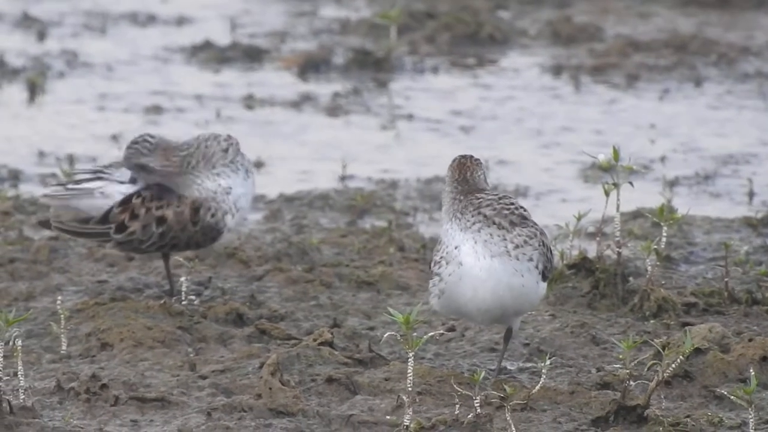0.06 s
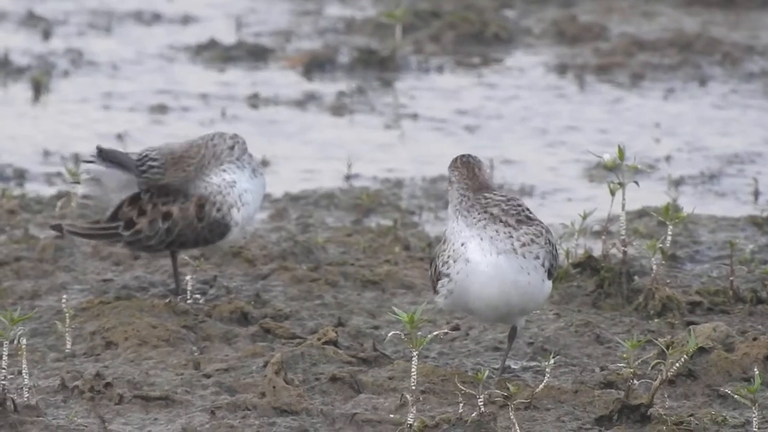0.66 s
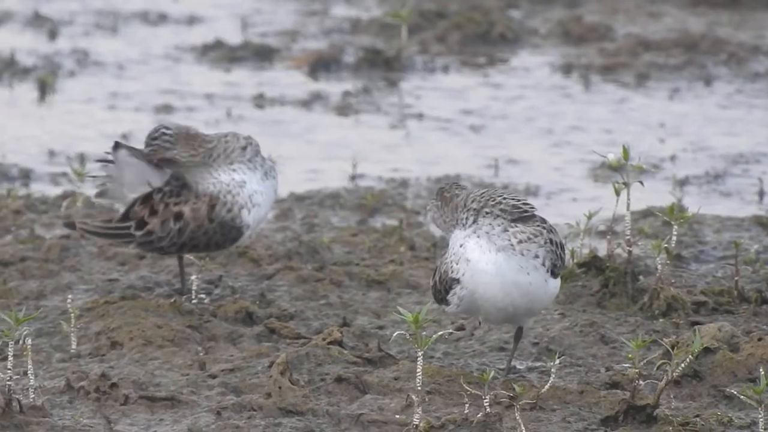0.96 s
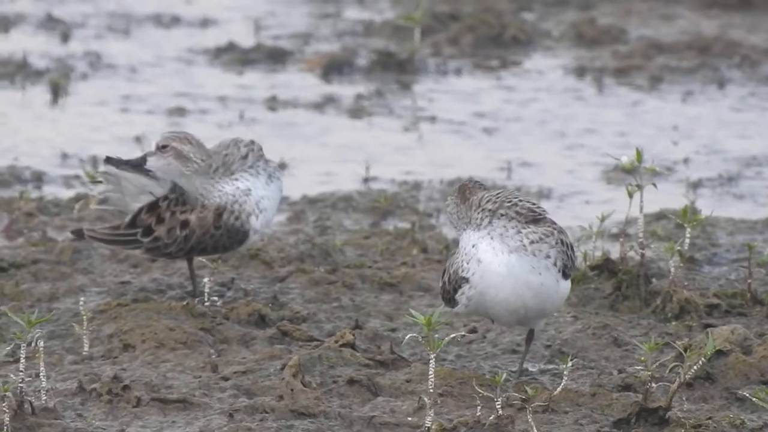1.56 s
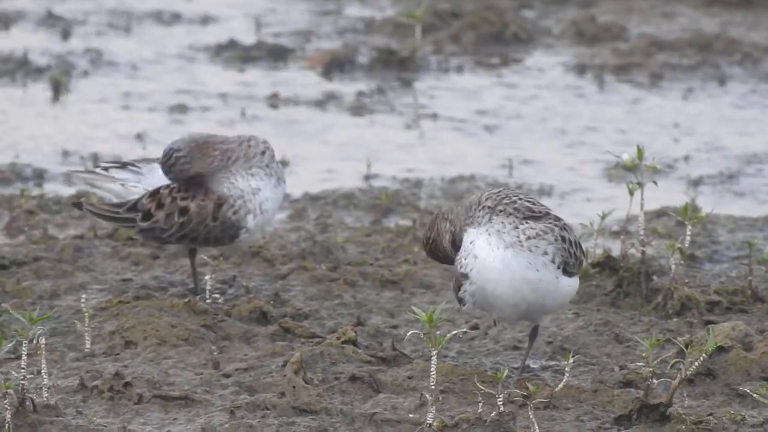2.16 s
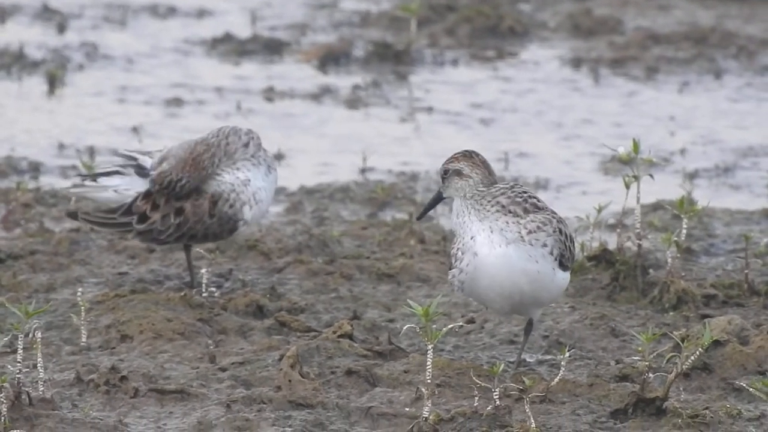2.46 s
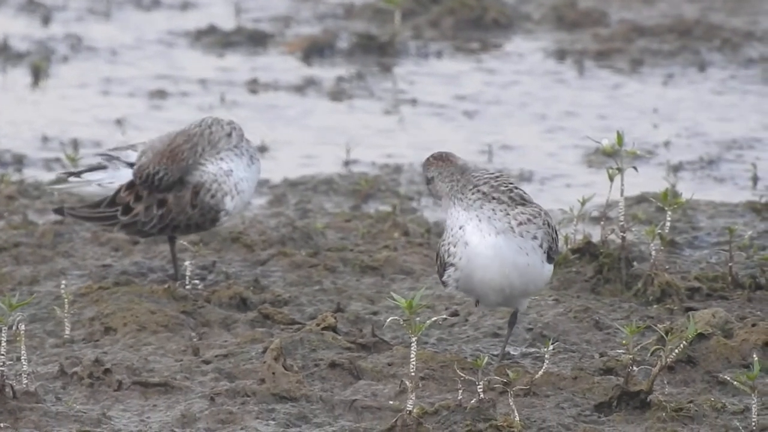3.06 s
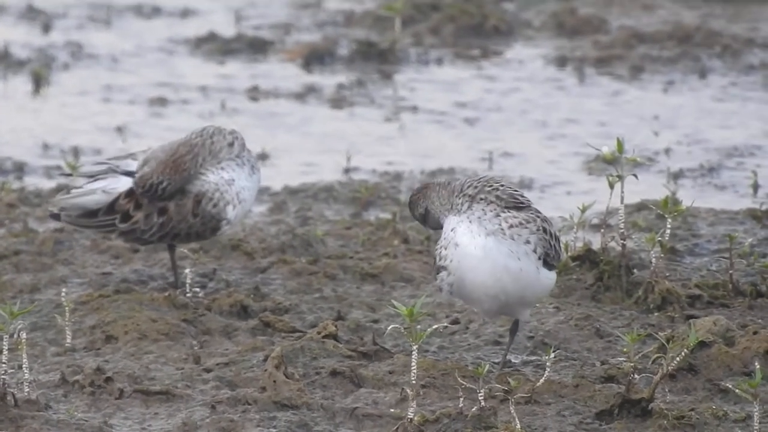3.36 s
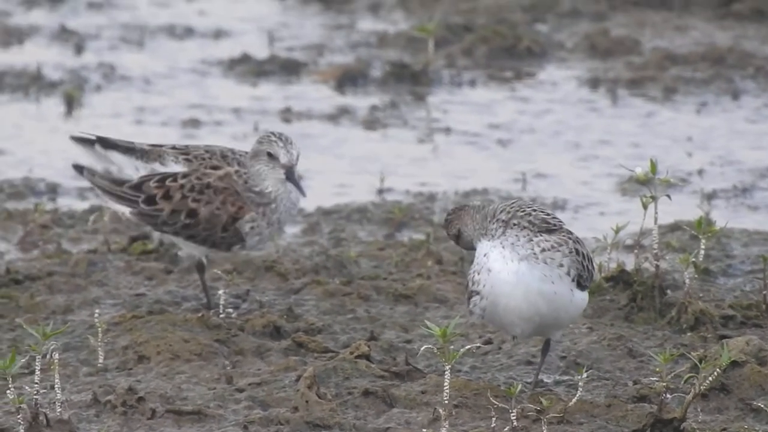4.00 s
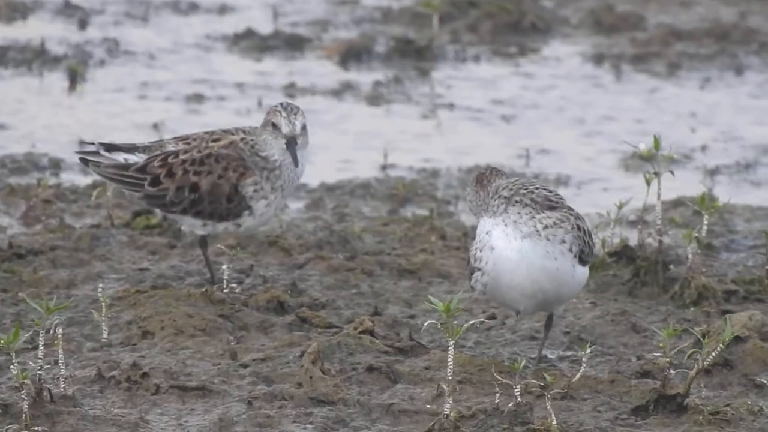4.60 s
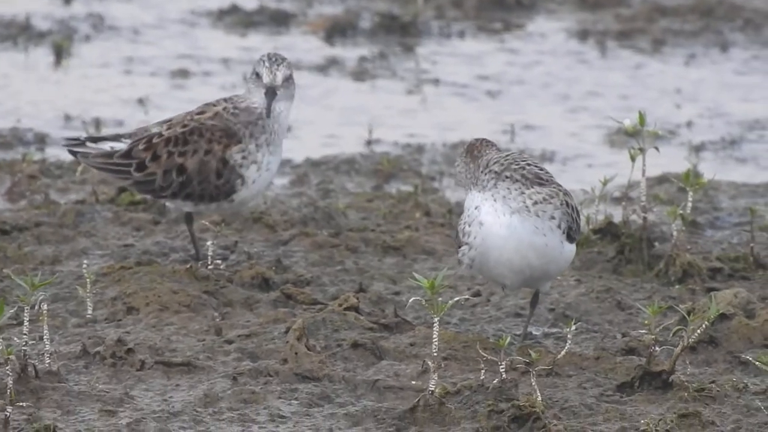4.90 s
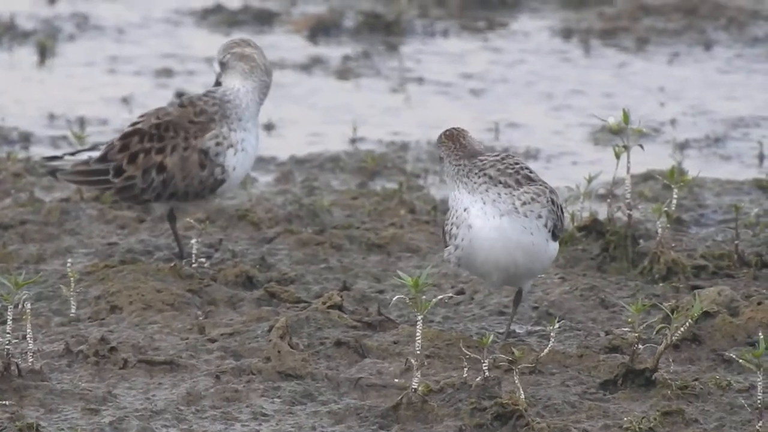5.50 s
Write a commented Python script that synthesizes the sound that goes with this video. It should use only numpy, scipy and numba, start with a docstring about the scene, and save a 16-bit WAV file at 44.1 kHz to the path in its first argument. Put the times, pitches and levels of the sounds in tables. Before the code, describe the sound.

Low wind rumble thumps on the microphone from the first instant, outdoors on an open mudflat, and returns in uneven puffs through the first second and a half. Far behind it, birds give faint hoarse peeps and tiny high chips over a soft hush of land and water. From about 1.3 seconds one bird faintly repeats a falling note, and a thin whistle stands out in a lull near 1.7 seconds. The wind builds again at 2.1 seconds and is loudest from 2.4 to 2.8, with hard thumps, ticks and crackles. Two low, gull-like mews follow around 2.8 and 3.2 seconds, with a dry, high trill from 2.9 to 3.5. Another mew comes near 4.2 seconds and a falling whistle at 5. Lighter gusts, mostly on the right, continue until the end at about 5.6 seconds. The birds always stay much quieter than the wind.

```python
"""Wind thumps on the microphone, out on an open mudflat. Far across the flat birds call: whistles,
low mews, arched peeps, short chips and one dry trill, over a faint hush of land and water.
The calls are gliding tones and resonant noise, hoarse where pitch and strength waver fast.
Gusts buffet the microphone's two ports separately; the hardest eddies hit the camera's limiter,
which reacts a moment late and so ticks and crackles."""
import sys
import numpy as np
from scipy import signal
from scipy.fft import rfft, irfft
from scipy.io import wavfile
from scipy.ndimage import uniform_filter1d
from numba import njit

SR = 44100
rng = np.random.default_rng(int(sys.argv[2]) if len(sys.argv) > 2 else 0)


def store_wav(level_fs):
    """Save 16-bit WAV to argv[1]."""
    pcm = np.round(np.clip(np.atleast_2d(level_fs), -1, 1) * 32767)
    wavfile.write(sys.argv[1], SR, pcm.T.astype(np.int16))


N = 249165
TIME = np.arange(N) / SR


def undb(db):
    """Decibels to gain."""
    return 10 ** (np.asarray(db) / 20)


def unit(x):
    """Scale to rms 1."""
    return x / np.sqrt(np.mean(x ** 2) + 1e-18)


def over_time(points):
    """Points joined by straight lines in time, for every sample."""
    return np.interp(TIME, *np.transpose(points))


def over_bins(points):
    """Points joined on a log-frequency axis, for every spectral bin."""
    hz, value = np.transpose(points)
    return np.interp(np.log(np.fft.rfftfreq(N, 1 / SR) + 1), np.log(hz), value)


def smooth(x, first, second):
    """Two moving averages in a row, their lengths in samples."""
    return uniform_filter1d(uniform_filter1d(x, first), second)


def noise(gain):
    """Noise with the given gain per bin."""
    return irfft(rfft(rng.standard_normal(N)) * gain, N)


def band_noise(hz, width_hz, shape=N):
    """Noise passed twice through one resonance."""
    b, a = signal.iirpeak(hz, hz / width_hz, fs=SR)
    return signal.lfilter(b, a, signal.lfilter(b, a, rng.standard_normal(shape)))


def walk(rate):
    """Smooth wandering through `rate` random values a second; rms 1."""
    step = max(int(SR / rate), 2)
    held = np.repeat(rng.standard_normal(N // step + 1), step)
    return unit(smooth(held, step, step)[:N])


def ports(pan_db):
    """Left and right gains of mean power 1; a positive pan is to the left."""
    pair = undb([[pan_db / 2], [-pan_db / 2]])
    return unit(pair)


def add(out, start, sound):
    """Mix a sound in at a time in seconds."""
    i = max(int(start * SR), 0)
    out[..., i:i + sound.shape[-1]] += sound[..., :N - i]


def hush(level_db=-58.5, flicker_db=1.5, bass_db=-5.5):
    """Faraway land and water: the middle register wavers, the hiss above it stays smooth."""
    # colour of the open air: (frequency [Hz], relative density [dB])
    spectrum = [(15, -48), (25, -6), (55, 8.5), (103, 4.5), (250, -11), (450, -25), (700, -31.5),
                (1000, -28.5), (1400, -34.5), (1900, -33.5), (3300, -35.5), (4400, -32), (6400, -33),
                (8500, -38), (15000, -47.5)]
    # likeness of left and right: (frequency [Hz], correlation [0..1])
    likeness = [(60, 0.9), (300, 0.6), (1400, 0.57), (3100, 0.37), (7000, 0.054), (15000, .1)]
    # slow swell of the middle register: (time [s], gain [dB])
    swell = [(0, 1.5), (.8, -2), (1.55, 0.5), (1.85, 3.5), (3.2, 0), (3.7, 3), (4.3, 3.5), (5.1, -4.5),
             (5.65, 4)]
    gain, alike = undb(over_bins(spectrum)), over_bins(likeness)
    mid, side = noise(gain * np.sqrt(1 + alike)), noise(gain * np.sqrt(1 - alike))
    pair = np.array([mid + side, mid - side])
    bass = signal.sosfiltfilt(signal.butter(4, 380, fs=SR, output="sos"), pair)
    upper = pair - bass
    middle = signal.sosfiltfilt(signal.butter(2, 3000, fs=SR, output="sos"), upper)
    hiss = upper - middle
    air = undb(bass_db) * bass + middle * undb(over_time(swell) + flicker_db * walk(12)) + hiss
    return air / np.std(upper.mean(axis=0)) * undb(level_db)


def hums(waver_db=1.5):
    """Narrow bands of far-off hum that waver in level, alike at both ports."""
    # distant hums: (centre [Hz], resonance width [Hz], level [dB])
    bands = [(329, 66, -65.5), (466.3, 56, -67), (646, 82, -71.5), (760, 13.7, -69.5), (1136, 69, -83),
             (1388, 62, -71)]
    return sum(undb(db + waver_db * walk(21.95)) * unit(band_noise(hz, width_hz))
               for hz, width_hz, db in bands)


def shore(x, wet_db, t60_s=0.13):
    """Banks and plants scatter a thin, short tail that arrives 6 ms behind the direct sound."""
    t = np.arange(SR // 2) / SR
    tail = rng.standard_normal((2, len(t))) * undb(-60 * t / t60_s) * (t > .006)
    tail /= np.sqrt(np.sum(tail ** 2, axis=1, keepdims=True))
    return x + undb(wet_db) * signal.fftconvolve(x, tail, axes=1)[:, :N]


def note(length, pitches, partials_db, waver, edge):
    """A bird note gliding through its pitches; fast wavering of pitch and strength makes it hoarse."""
    n = max(int(length * SR), 64)
    progress = np.linspace(0, 1, n)
    contour = np.polyfit(np.linspace(0, 1, len(pitches)), pitches, len(pitches) - 1)
    hz = np.polyval(contour, progress)
    knots_s = np.arange(160) * .0015
    jitter = rng.standard_normal((2, len(knots_s)))
    wobble, shimmer = (np.interp(progress * length, knots_s, row) for row in jitter)
    phase = 2 * np.pi * np.cumsum(hz * (1 + waver * wobble)) / SR
    tone = sum(undb(db) * np.sin(k * phase) for k, db in enumerate(partials_db, 1))
    return np.sqrt(2) * tone * undb(2 * shimmer) * signal.windows.tukey(n, edge)


def rasp(length, hz, width_hz, spread=0.21):
    """A hoarse patch of noise in one resonance, mostly alike left and right."""
    n = int(length * SR)
    mid, side = band_noise(hz, 0.86 * width_hz, (2, n))
    pair = np.array([mid + spread * side, mid - spread * side])
    return unit(pair) * signal.windows.tukey(n, .6)


def flock(faintest_db=-68.5, range_db=4.0, low_hz=1500, high_hz=4400, arch=.14, count=70):
    """The farthest birds chatter at random across the flat, barely above the hush."""
    out = np.zeros((2, N))
    for when, size, pitch, glide, loud, side in rng.random((count, 6)):
        hz = low_hz * (high_hz / low_hz) ** pitch
        pitches = [hz * (1 - arch * glide), hz, hz * (1 - arch * (1 - glide))]
        peep = note(.025 + .05 * size, pitches, partials_db=[0, -12], waver=.03, edge=.7)
        add(out, when * N / SR, ports(8 * (side - .5)) * undb(faintest_db + range_db * loud) * peep)
    return out


def peeps(onset_ratio=.88, rasp_db=-4.0):
    """Hoarse peeps arch up and over, far off and a little to the right."""
    # arched peeps: (time [s], length [s], level [dB], top [Hz], end [Hz])
    calls = [(0.109, 0.035, -60, 2610, 2100), (.528, 0.047, -62, 2410, 2260), (.899, .082, -65, 2234, 2050),
             (1.237, 0.075, -59.5, 2500, 2220), (1.276, 0.04, -59, 4500, 4380),
             (1.855, 0.02, -54.5, 2004, 1810), (1.983, 0.035, -59, 4470, 4300),
             (2.761, 0.083, -62, 2440, 2060), (3.178, 0.14, -62, 2460, 1890),
             (3.487, 0.089, -62, 2520, 2190), (3.8, 0.074, -60.5, 2565, 2000),
             (4.018, 0.079, -56.5, 2795, 1760), (4.644, 0.048, -60, 2600, 1830),
             (5.467, 0.038, -64, 4030, 3350)]
    out = np.zeros((2, N))
    for start, length, db, top_hz, end_hz in calls:
        pitches = [top_hz * onset_ratio, top_hz, end_hz]
        add(out, start, undb(db) * note(length, pitches, partials_db=[1.5, -10], waver=.037, edge=.46))
        add(out, start, undb(db + rasp_db) * rasp(length, top_hz, width_hz=1500))
    return ports(pan_db=-2.0) * out


def falling_run(start_s=1.311, step_s=.147, note_s=0.044, level_db=-59, count=7):
    """One far bird, a little to the right, repeats a falling note at an even pace."""
    out = np.zeros((2, N))
    for k, (loud, sharp) in enumerate(rng.standard_normal((count, 2))):
        pitches = np.array([2704, 2484, 2480]) * (1 + .012 * sharp)
        tone = note(note_s, pitches, partials_db=[3, -12], waver=0.026, edge=0.34)
        add(out, start_s + k * step_s, undb(level_db + .8 * loud) * tone)
    return ports(pan_db=-2.0) * out


def rasps(grain_db=5.0):
    """Short hoarse, grainy patches of sound among the calls."""
    # rasps: (time [s], length [s], level [dB], centre [Hz], nominal width [Hz])
    patches = [(0.474, 0.08, -61, 2570, 2520), (1.722, 0.25, -60, 1010, 2980),
               (1.901, 0.066, -59.5, 4030, 1800), (2.84, 0.11, -59, 3700, 2240),
               (3.546, 0.077, -63, 2510, 2500), (3.95, 0.52, -61, 432, 218),
               (4.187, 0.058, -55, 1750, 2980), (4.529, 0.045, -61, 4050, 2200),
               (5.339, 0.053, -61, 4040, 1000), (5.46, 0.094, -64.5, 2600, 2510)]
    out = np.zeros((2, N))
    for start, length, db, hz, width_hz in patches:
        add(out, start, undb(db) * rasp(length, hz, width_hz))
    return out * undb(grain_db * walk(230))


def trill(start_s=2.935, pulse_hz=34.7, slowing_hz_per_s=10.0, low_hz=4850, high_hz=5650, lag_s=.00006):
    """A bird off to the right: quick rising pulses that slow down, each led by a lower, hoarse one."""
    # loudness of the trill: (time [s], level [dB])
    levels = [(2.88, -70), (2.93, -51), (2.96, -55), (3.02, -55), (3.17, -54), (3.22, -50.5), (3.37, -48.5),
              (3.43, -51), (3.48, -70)]
    t = TIME - start_s
    cycle = (pulse_hz * t - slowing_hz_per_s * t ** 2 / 2 + .5) % 1
    gate = np.sin(np.pi * cycle) ** 4
    early_gate = np.roll(gate, -int(0.0017 * SR))
    hz = (low_hz + (high_hz - low_hz) * cycle) * (1 + 0.02 * walk(900))
    tone = unit(gate * np.sin(2 * np.pi * np.cumsum(hz) / SR))
    buzz = unit(gate * band_noise(5060, width_hz=1000))
    lower = unit((0.52 + early_gate) * band_noise(2950, width_hz=1000))
    voice = undb(over_time(levels)) * (undb(-2) * tone + undb(-4) * buzz + undb(-9) * lower)
    late_left = np.roll(voice, round(lag_s * SR))
    return np.array([late_left, voice]) * ports(pan_db=-1.0)


def mews(onset_ratio=0.96, release_ratio=0.907, tremble_db=2.0, rasp_db=-11.5, rasp_stretch=1.47):
    """Low mews scoop up, glide and fall off at the end, trembling, with a rasp above the tone."""
    # gull-like mews: (time [s], length [s], level [dB], early pitch [Hz], late pitch [Hz])
    calls = [(2, 0.042, -59.5, 1436, 1363), (2.82, .16, -50.5, 1468, 1368), (3.16, 0.11, -50.5, 1310, 1252),
             (3.872, .125, -59, 1478, 1600), (4.204, 0.18, -51.5, 1222, 1300)]
    # harmonics from the fundamental up: (gain [dB])
    partials_db = [-0.5, -21.5, -14.5, -20]
    out = np.zeros((2, N))
    for start, length, db, early_hz, late_hz in calls:
        middle_hz = (early_hz + late_hz) / 2
        pitches = [early_hz * onset_ratio, early_hz, middle_hz, late_hz, late_hz * release_ratio]
        add(out, start, undb(db) * note(length, pitches, partials_db, waver=0.028, edge=0.18))
        add(out, start, undb(db + rasp_db) * rasp(length * rasp_stretch, hz=3400, width_hz=2300))
    return out * undb(tremble_db * walk(70))


def chips():
    """Very short high chips, each one quick sweep, from left, right and straight ahead."""
    # chips: (time [s], length [s], level [dB], from [Hz], to [Hz], left minus right [dB])
    calls = [(0.297, 0.013, -51, 6130, 5670, -5), (1.005, 0.017, -50.5, 5100, 5470, 0),
             (1.019, 0.01, -45, 5270, 7140, -4), (1.133, 0.0062, -50, 5500, 5050, 0),
             (1.356, 0.022, -52.5, 4980, 6200, -6), (4.805, 0.0061, -48, 4750, 4070, 6),
             (5.36, 0.01, -52.5, 4960, 5400, -5), (5.377, 0.01, -54, 5380, 4700, 0)]
    out = np.zeros((2, N))
    for start, length, db, from_hz, to_hz, pan_db in calls:
        chip = note(length, [from_hz, to_hz], partials_db=[0], waver=0.06, edge=0.61)
        add(out, start, ports(pan_db) * undb(db) * chip)
    return out


def whistles():
    """High whistles from straight ahead slide onto a held pitch and fall off it."""
    # whistles: (time [s], length [s], level [dB], opening pitch [Hz], held pitch [Hz])
    calls = [(1.744, 0.12, -45.5, 3660, 3530), (2.319, 0.031, -45, 3640, 3580),
             (2.86, 0.026, -50.5, 4900, 5100), (5.013, .075, -52.5, 4130, 3220)]
    # glide at even steps after the opening: (pitch over held pitch [ratio])
    glide = [.985, 1.01, 0.98, .9]
    # harmonics from the fundamental up: (gain [dB])
    partials_db = [-1.5, -23]
    out = np.zeros((2, N))
    for start, length, db, opening_hz, held_hz in calls:
        pitches = [opening_hz, *(held_hz * np.array(glide))]
        add(out, start, undb(db) * note(length, pitches, partials_db, waver=0.0185, edge=0.12))
    return out


def gusts(breeze_db=-53, rise_db_per_s=237, fall_db_per_s=135, wake_db=-12, wake_db_per_s=78):
    """Level at each port in dB: every gust rises, holds and dies away inside a weaker, slower wake."""
    # gusts at the microphone: (time [s], hold [s], left level [dB], right level [dB])
    blows = [(0, 0.069, -11, -16), (0.113, 0.12, -23.5, -28), (0.448, .1, -30, -32),
             (0.637, 0.017, -25.5, -15), (0.769, 0.11, -24, -16.5), (1.085, 0.022, -26.5, -15.5),
             (1.21, 0.087, -14, -19), (1.372, 0.11, -21.5, -21), (2.108, 0.19, -14.5, -15),
             (2.359, 0.4, -9.5, -8), (2.869, 0.14, -16.5, -16.5), (3.073, 0.069, -31.5, -14.5),
             (3.306, 0.027, -25, -25), (3.693, 0.15, -44, -21), (3.859, 0.073, -31, -16.5),
             (4.018, 0.028, -50, -26), (4.504, .04, -48, -22.5), (4.626, 0.11, -44, -16.5),
             (4.779, 0.13, -14.5, -27.5), (5.003, 0.063, -31, -20), (5.273, 0.047, -27, -19)]
    strength = undb(breeze_db)
    for start, hold, *port_db in blows:
        before, after = np.maximum(start - TIME, 0), np.maximum(TIME - start - hold, 0)
        core = undb(-rise_db_per_s * before - fall_db_per_s * after)
        wake = undb(wake_db - wake_db_per_s * (before + after))
        strength = np.maximum(strength, np.outer(undb(port_db), np.maximum(core, wake)))
    return 20 * np.log10(strength)


def turbulence(level_db, puff_rate=34, lull=0.16, flutter_db=5.0, fine_from_db=-7.5, crest=0.54):
    """Air rumbles over one port in quick puffs; the stronger the puff, the more fine turbulence."""
    # wind rumble: (frequency [Hz], relative density [dB])
    rumble_spectrum = [(15, -52), (25, -20.5), (62, 4), (85, 7), (110, 5), (190, -11.5), (275, -48),
                       (400, -69), (700, -66), (1500, -101)]
    # finer turbulence of strong gusts: (frequency [Hz], relative density [dB])
    fine_spectrum = [(100, -23), (200, 2), (260, -19), (340, -25.5), (560, -45.5), (1000, -52.5),
                     (2200, -48), (4000, -61), (9000, -70)]
    puffs = unit(np.sqrt(lull ** 2 + np.tanh(walk(puff_rate)) ** 2))
    strength = undb(level_db) * puffs
    fine = strength / undb(fine_from_db) * noise(undb(over_bins(fine_spectrum)))
    rumble = noise(undb(over_bins(rumble_spectrum)))
    flow = (rumble + fine) * undb(flutter_db * walk(32))
    span = int(0.051 * SR)
    flow *= strength / np.sqrt(smooth(flow ** 2, span, span // 2) + 1e-18)
    # ordinary puffs seldom swing further than the crest
    excess = (1 + (np.abs(signal.hilbert(flow)) / crest) ** 6) ** (1 / 6)
    return flow / smooth(excess, 150, 150)


def small_eddies(level_db, over_gust_db=7, scatter_db=0.5, count=110):
    """Random eddies that scale with the gust carrying them: (time [s], peak [dB], port)."""
    rows = []
    for when, side, size in rng.random((count, 3)):
        port = int(2 * side)
        peak_db = level_db[port, int(when * N)] + over_gust_db + scatter_db * (1 - 2 * size)
        rows.append((when * N / SR, peak_db, port))
    return rows


def wind(eddy_hz=113.8, eddy_s=0.00448, clear_s=0.0039, peak_delay_s=0.001177):
    """Wind right on the microphone: each port has its own turbulence; an eddy is one pressure swing."""
    # hardest eddies: (time [s], peak [dB], port [0 left, 1 right])
    hard_eddies = [(.018, 0, 0), (0.042, 0.5, 0), (.056, 2, 0), (0.084, -3, 1), (1.092, -2.5, 1),
                   (1.266, -5.5, 0), (1.443, -1.5, 0), (2.116, -2, 1), (2.133, -3, 1), (2.18, -3, 1),
                   (2.233, -2, 1), (2.295, -5.5, 0), (2.360, -1.5, 1), (2.377, 1, 1), (2.404, 0.5, 1),
                   (2.431, 9, 0), (2.478, 7, 0), (2.508, -2, 1), (2.551, 3.5, 1), (2.571, 10.5, 1),
                   (2.616, 6, 0), (2.631, 14.5, 1), (2.693, 4.5, 1), (2.712, 1.5, 1), (2.736, 1.5, 1),
                   (2.747, 10, 0), (2.777, -2.5, 0), (2.866, 3.5, 0), (2.919, -2, 0), (4.707, -3.5, 1),
                   (4.832, -2, 0)]
    level_db = gusts()
    out = np.array([turbulence(port_db) for port_db in level_db])
    for start, db, port in small_eddies(level_db) + hard_eddies:
        middle = (start + peak_delay_s) * SR
        near = np.arange(max(int(middle) - 1700, 0), min(int(middle) + 1700, N))
        t = (near - middle) / SR
        swing = np.cos(2 * np.pi * eddy_hz * t) * np.exp(-(t / eddy_s) ** 2)
        # the eddy sweeps the smaller turbulence off the port
        out[port, near] *= 1 - np.exp(-(t / clear_s) ** 2)
        out[port, near] += rng.choice([-1, 1]) * undb(db) * swing
    return out * signal.windows.tukey(N, .003)


@njit
def limiter(x, hunting, ceiling, wait, attack, release):
    """A peak slips over the ceiling briefly; the gain snaps down, hunts while it holds, and recovers."""
    y, gain, samples_over, busy = np.empty(len(x)), 1., 0., 0.
    for i in range(len(x)):
        busy *= .98
        if abs(x[i]) * gain > ceiling:
            samples_over += 1
            if samples_over > wait:
                gain += attack * (ceiling / abs(x[i]) - gain)
                busy = 1.
        else:
            samples_over = 0.
            gain += release * (1 - gain)
        y[i] = gain * x[i] * (1 + busy * hunting[i])
    return y


def scene():
    """Birds at two distances over the hush of the flat, with the wind right on the microphone."""
    nearer = shore(whistles() + chips() + mews() + trill() + rasps(), wet_db=-11.5)
    farther = shore(peeps() + falling_run() + flock(), wet_db=-10.5)
    return nearer + farther + hush() + hums() + wind()


def record(dry, ceiling=.5, wait_s=0.00037, attack_s=0.00015, release_s=0.011, hunt_db=-34.0,
           low_cut_hz=22, top_hz=15500):
    """Each channel is limited alone, fizzing on held peaks; the deepest rumble and the top are cut."""
    hunting = undb(hunt_db) * signal.lfilter([.6], [1, -.4], rng.standard_normal((2, N)))
    attack, release = 1 / (attack_s * SR), 1 / (release_s * SR)
    held = np.array([limiter(channel, hunt, ceiling, wait_s * SR, attack, release)
                     for channel, hunt in zip(dry, hunting)])
    held = signal.sosfiltfilt(signal.butter(2, low_cut_hz, "highpass", fs=SR, output="sos"), held)
    return signal.sosfilt(signal.ellip(10, .2, 80, top_hz, fs=SR, output="sos"), held)


dry = scene()
out = record(dry)
store_wav(out)
```